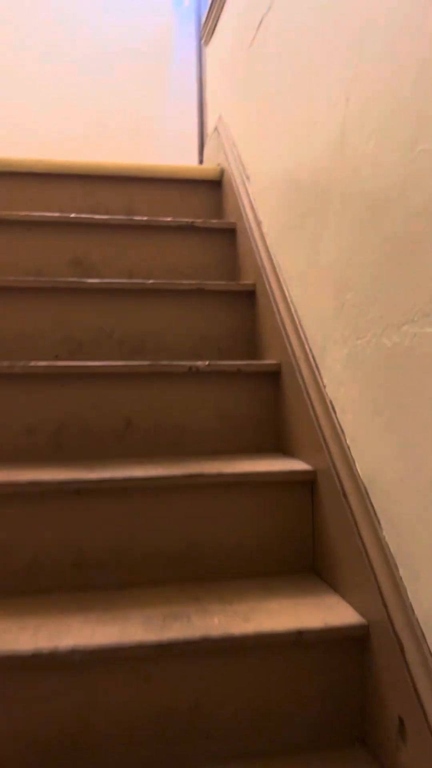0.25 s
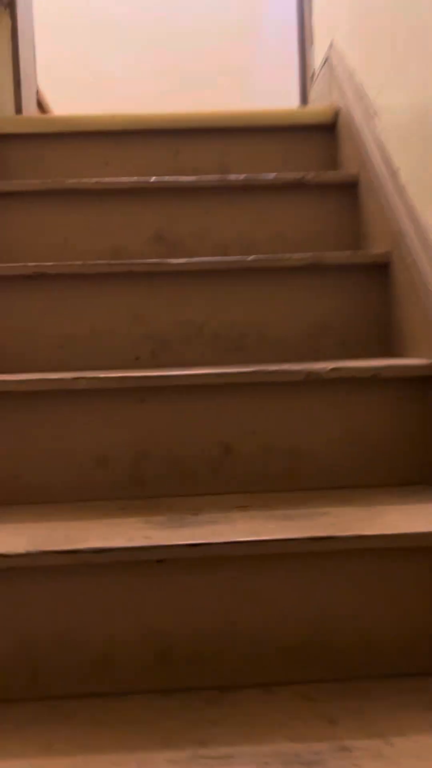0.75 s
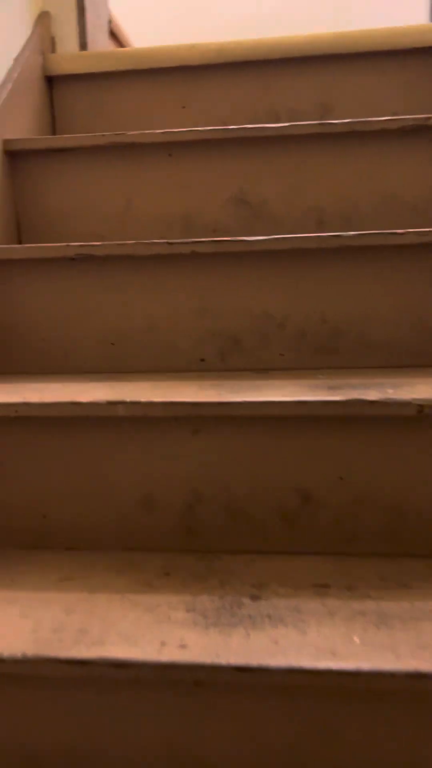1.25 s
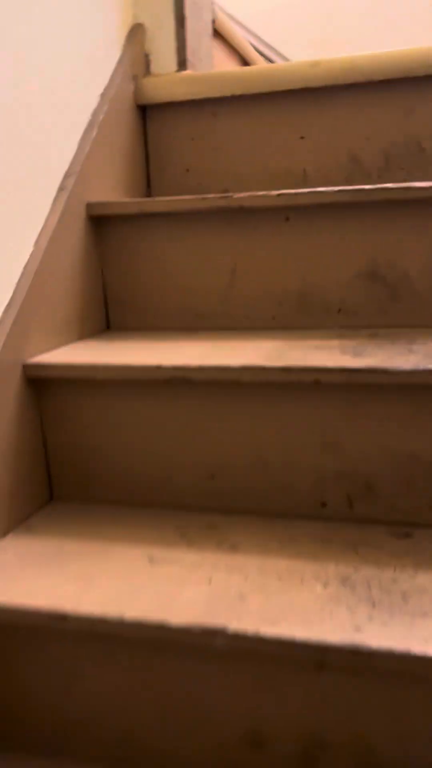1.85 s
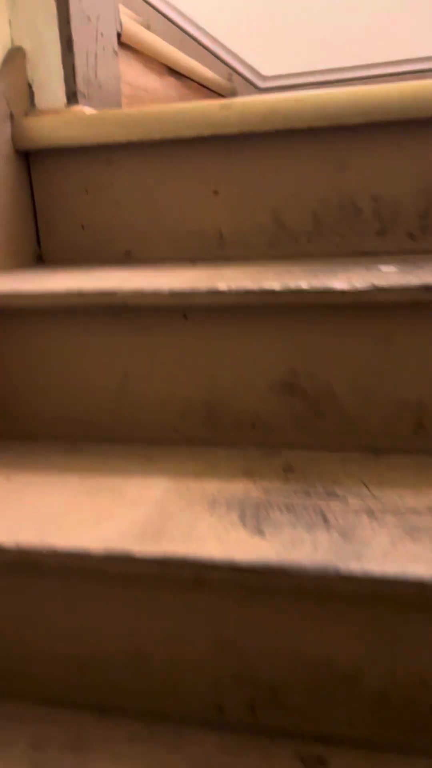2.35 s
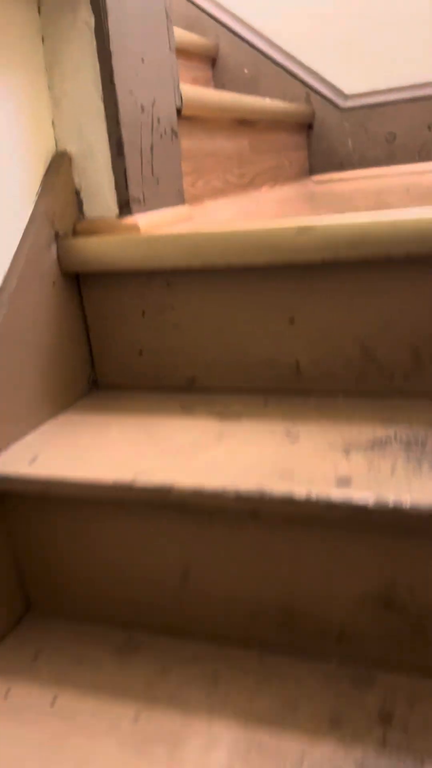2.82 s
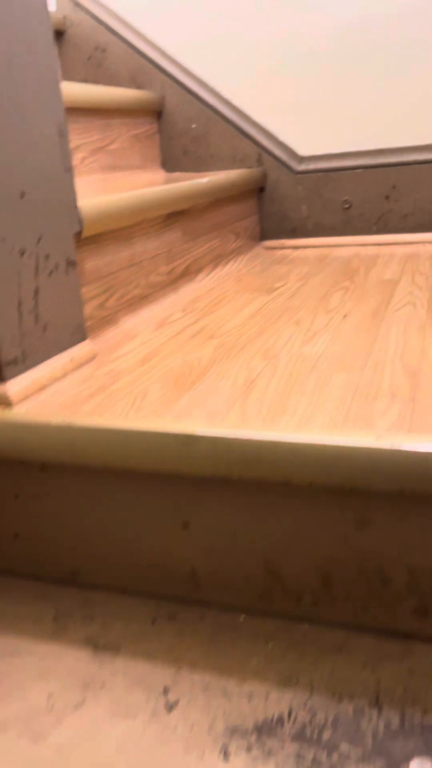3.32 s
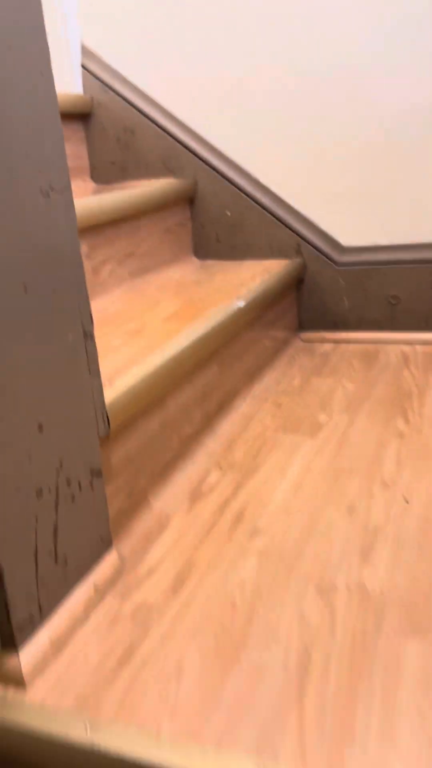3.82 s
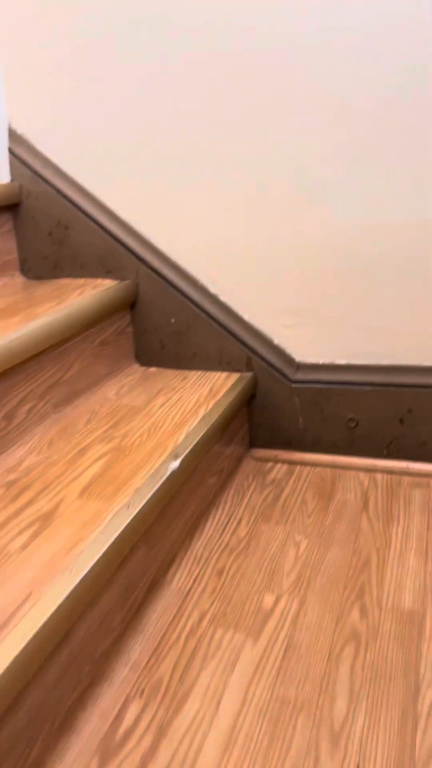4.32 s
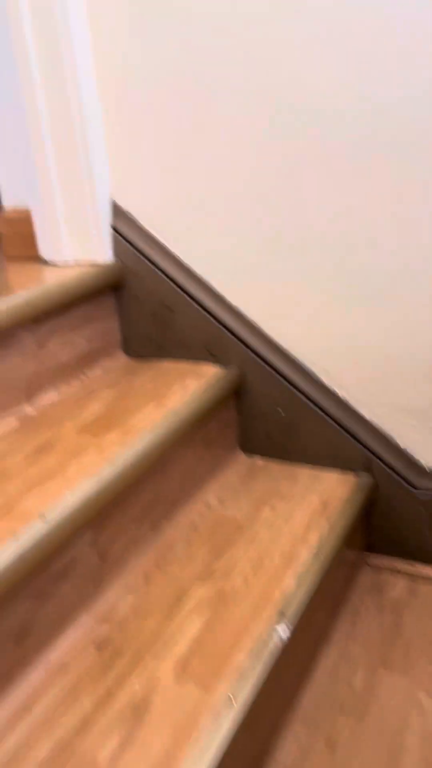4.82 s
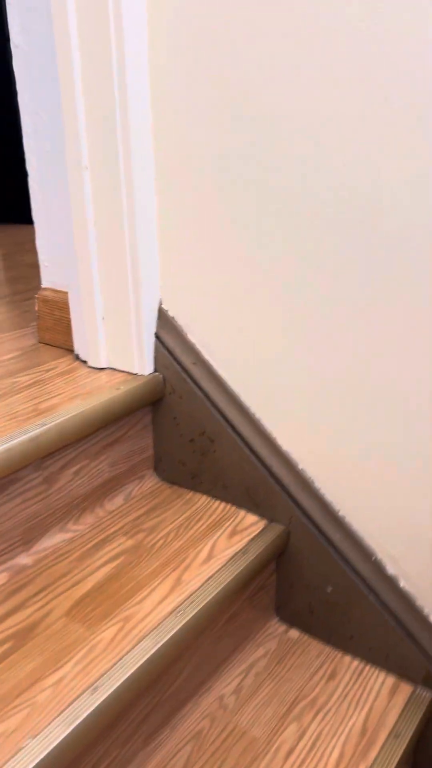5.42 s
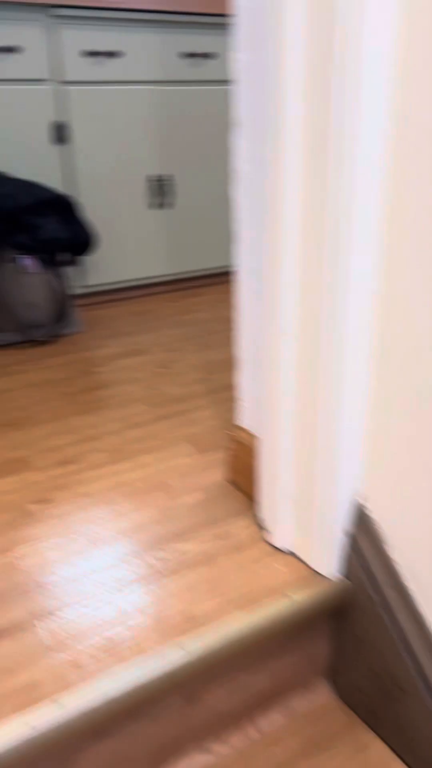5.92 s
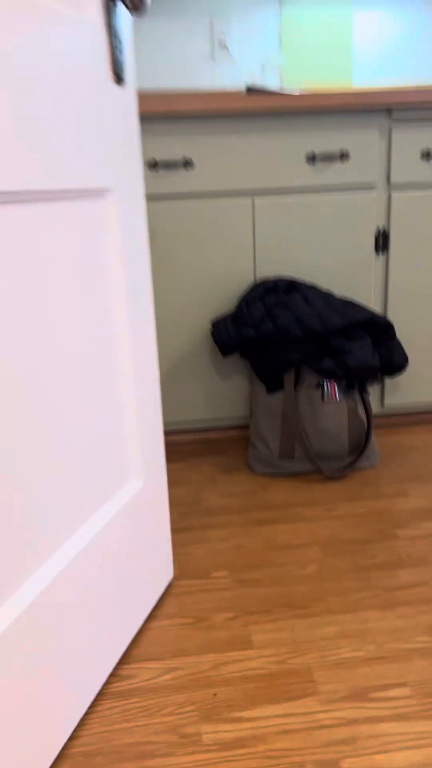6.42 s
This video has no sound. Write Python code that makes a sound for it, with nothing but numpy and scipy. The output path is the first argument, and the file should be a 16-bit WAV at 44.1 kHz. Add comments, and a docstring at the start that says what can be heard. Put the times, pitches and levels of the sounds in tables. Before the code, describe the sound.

Close, handheld perspective of one person going upstairs indoors. Heavy, cushioned shoe thuds ring woody treads, with dry joint snaps and two short creaks early on, and a cluster of sharp cracks just after two seconds. Midway the soles rub grittily over a landing, then lighter steps continue up to the floor. Low rumble, clothing rustle and small mechanical ticks remain underneath, in a short, enclosed reverberation.

```python
"""A quiet house first: unsteady low rumble, room hush and brushing clothes, faint scuffs and lens ticks.
From 0.5 s someone in shoes climbs a wooden staircase and ends on a wood floor: each footfall knocks on its
tread through wood modes, grit and joints snap as noise bursts, and the weight booms as decaying sines.
Gliding harmonics squeak at 1.4 and 1.8 s; grainy noise scuffs most on the landing, from 3.5 to 4.3 s.
Filtered, decaying noise echoes give the stairwell; lens ticks go on to the end."""
import sys
import numpy as np
from scipy import signal
from scipy.fft import rfft, irfft, next_fast_len
from scipy.io import wavfile
from scipy.ndimage import uniform_filter1d

SR = 44100
rng = np.random.default_rng(int(sys.argv[2]) if len(sys.argv) > 2 else 0)


def pcm_store(signal):
    """Save signal as 16-bit PCM."""
    levels = np.round(np.clip(np.atleast_2d(signal), -1, 1) * 32767)
    wavfile.write(sys.argv[1], SR, levels.astype(np.int16).T)


N = 294030
AGE_S = np.arange(SR * 11 // 20) / SR  # time since the start of one hit


def amp(db):
    """Decibels to gain."""
    return 10 ** (np.asarray(db) / 20)


def unit(x):
    """Scale to rms 1."""
    return x / np.sqrt(np.mean(x ** 2) + 1e-20)


def crest(x, size):
    """Scale a stereo sound so that the loudest stretch of size samples in its mid has rms 1."""
    return x / np.sqrt(uniform_filter1d(x.mean(0) ** 2, size, mode="constant").max())


def along(points, hz):
    """Read (frequency [Hz], value) points on a log frequency axis."""
    f, v = np.transpose(points)
    return np.interp(np.log(hz + 1), np.log(f), v)


def curves(rows):
    """One value per sample for each column after the time."""
    time_s, *columns = np.transpose(rows)
    return [np.interp(np.arange(N) / SR, time_s, column) for column in columns]


def filtered(x, response):
    """Multiply the spectrum of x by a response of frequency."""
    n = x.shape[-1]
    m = next_fast_len(n + 2048)
    return irfft(rfft(x, m) * response(np.fft.rfftfreq(m, 1 / SR)), m)[..., :n]


def coloured(x, spectrum):
    """Shape x by a (frequency [Hz], gain [dB]) spectrum, at rms 1."""
    return unit(filtered(x, lambda hz: amp(along(spectrum, hz))))


def fade(t, t60):
    """Exponential decay by 60 dB in t60 seconds."""
    return np.exp(-np.log(1000) * t / t60)


def onset(time_constant_s):
    """Exponential rise of one hit towards 1."""
    return 1 - np.exp(-AGE_S / time_constant_s)


def noise():
    """Fresh white noise as long as one hit."""
    return rng.standard_normal(len(AGE_S))


def uneven(size):
    """Noise smoothed over size samples, at rms 1: the irregularity within one hit."""
    return unit(uniform_filter1d(noise(), size=size))


def add(out, s, x):
    """Mix x into out from time s."""
    part = out[:, max(round(s * SR), 0):][:, :x.shape[-1]]
    part += x[..., :part.shape[1]]


# stereo width: (frequency [Hz], side re mid [dB])
SIDE_WIDTH = [(100, -66), (250, -29.5), (500, -13), (1000, -2.5), (2000, -12.5), (4000, -3), (10000, -8.5)]


def spread(pair, wide_db=0):
    """Two unrelated signals as mid and side: narrow in the bass, wider in the treble."""
    side = filtered(pair[1], lambda hz: amp(along(SIDE_WIDTH, hz) + wide_db))
    return np.array([pair[0] + side, pair[0] - side])


# decay of the stairwell: (frequency [Hz], t60 [s])
STAIRWELL_T60 = [(60, 0.4), (200, 0.41), (400, 0.41), (1000, 0.35), (3000, 0.38), (8000, 0.31),
                 (14000, 0.15)]


def echo(stretch=1):
    """The stairwell's answer from a new spot: decaying noise, energy 1 in the mid; stretch scales its t60."""
    hz, t, z = signal.stft(rng.standard_normal((2, len(AGE_S))), SR, nperseg=256)
    decay = fade(t, stretch * along(STAIRWELL_T60, hz)[:, None])
    tail = signal.istft(z * decay, SR, nperseg=256)[1][:, :len(AGE_S)]
    tail = tail * onset(0.00046)
    return spread(tail / np.linalg.norm(tail[0]))


def in_room(x, tail, wet_db):
    """Direct sound plus its echo."""
    return x + amp(wet_db) * signal.fftconvolve(x[None], tail, axes=1)[:, :len(x)]


# modes of a painted tread in the lower flight, and of a laminate one above the landing:
# (frequency [Hz], width [Hz], level [dB])
PAINTED_MODES = [(167.6, 20, 6.5), (199, 31, 3), (254.3, 24, 4.5), (311, 23, -1.5), (379, 26.6, 1.5),
                 (446, 120, -18), (604, 22, -15)]
LAMINATE_MODES = [(132, 33, -13), (208.5, 38, 1.5), (261.7, 11, 2), (326, 18, 1.5), (376.6, 44, -1),
                  (435, 22, -5)]
LANDING_END_S = 4.5
PAINTED_SOFT_HZ, LAMINATE_SOFT_HZ = 647, 434  # the shoe's cushioning dulls the sound above this


def tread(x, s, hz):
    """x through the modes of the tread underfoot at time s, at rms 1; the spot favours modes near hz."""
    on_paint = s < LANDING_END_S
    wood, soft_hz = (PAINTED_MODES, PAINTED_SOFT_HZ) if on_paint else (LAMINATE_MODES, LAMINATE_SOFT_HZ)
    mode = lambda f, c, width: 1j * f * width / (c * c - f * f + 1j * f * width)
    modes = lambda f: sum(amp(db) * mode(f, c, width) for c, width, db in wood)
    spot = lambda f: 1.3 + 1 / (1 + 1j * (f - hz) / 70)
    soft_sole = lambda f: 1 + 1j * f / soft_hz - (f / soft_hz) ** 2
    return unit(filtered(x, lambda f: modes(f) * spot(f) / soft_sole(f)))


# (time [s], level [dB])
CLOTH_LEVEL = [(0, -62), (.35, -62.5), (.48, -70), (.7, -63.5), (1, -60.5), (1.6, -62.5), (2.6, -56.5),
               (3.7, -63.5), (5.4, -60), (5.9, -62), (6.03, -61.5), (6.25, -63), (6.67, -62)]
RUMBLE_LEVEL_DB = [(0, -44), (1, -45), (3.5, -37.5), (5, -46.5), (6, -45), (6.67, -43)]
# spectra of rumble, house and cloth: (frequency [Hz], gain [dB])
RUMBLE_SPECTRUM = [(20, -24), (40, -4), (60, 2.5), (95, 0), (140, -5.5), (250, -14), (400, -23), (700, -33),
                   (2000, -65)]
HOUSE_SPECTRUM = [(100, -6), (250, -6), (400, 16.5), (600, 9), (1000, 8), (1500, 7), (2400, 2), (3500, -47),
                  (8000, -43)]
CLOTH_SPECTRUM = [(1500, -1), (2800, 2), (4500, -2.5), (8000, -1.5), (10500, -3.5), (12000, -37),
                  (16000, -15)]


def background():
    """Coloured noise: an unsteady low rumble, the hush of the house, clothes moving with the climb."""
    cloth_db, = curves(CLOTH_LEVEL)
    rumble_db, = curves(RUMBLE_LEVEL_DB)
    hush = lambda spectrum: spread(coloured(rng.standard_normal((2, N)), spectrum), wide_db=-1.0)
    sway_db = 2 * np.interp(np.arange(N), np.linspace(0, N, num=50), rng.standard_normal(50))
    rumble = amp(rumble_db + sway_db) * hush(RUMBLE_SPECTRUM)
    house = amp(-56.5) * hush(HOUSE_SPECTRUM)
    cloth = amp(cloth_db) * hush(CLOTH_SPECTRUM)
    return rumble + house + cloth


GRAINS_PER_S = 260
GRAIN_DB, GRAIN_SPREAD_DB = -1, 3.5  # coarse grains: level re the fine rub, scatter of size


def grains():
    """Friction under a sole: a fine rub with coarse grains catching at random moments."""
    flutter = unit(uniform_filter1d(rng.standard_normal(N), size=160))
    fine = unit(rng.standard_normal((2, N)) * amp(0.64 * flutter))
    sizes = amp(GRAIN_SPREAD_DB * rng.standard_normal(N).clip(-2, 2))
    catches = (rng.random(N) < GRAINS_PER_S / SR) * sizes
    coarse = signal.fftconvolve(catches, fade(AGE_S, .004))[:N] * rng.standard_normal((2, N))
    return unit(fine + amp(GRAIN_DB) * unit(coarse))


# soles sliding: (time [s], length [s], tread [dB], rub [dB], grit [dB], swell over the stroke [dB])
SCUFF_STROKES = [(0.145, 0.036, -64, -55, -81, -5), (0.23, 0.029, -65, -44, -64, -1),
                 (2.655, 0.02, -27.5, -34.5, -50.5, 0), (3.191, 0.056, -42.5, -50, -87, -11),
                 (3.503, 0.12, -42, -51.5, -61, -13.5), (3.613, 0.02, -38, -37, -72, 4),
                 (3.907, 0.1, -36, -39, -50.5, 1), (4.081, 0.034, -45, -34, -49.5, -6.5),
                 (4.137, 0.1, -39, -36.5, -52, 1), (4.229, 0.082, -36, -39, -55, 12),
                 (4.811, 0.057, -41.5, -47, -59, -7), (4.975, 0.045, -36.5, -38.5, -54.5, 0),
                 (5.284, 0.12, -47, -36.5, -53, -12), (5.607, 0.07, -38, -47.5, -53, 11),
                 (6.162, .015, -52, -60, -58.5, 0), (6.385, .02, -60, -57, -54.5, 1)]
# spectra: (frequency [Hz], gain [dB])
RUB_SPECTRUM = [(300, 3.5), (650, -2.5), (1200, -2.5), (2000, -6.5), (2600, -12.5), (3500, -16.5),
                (6000, -63)]
GRIT_SPECTRUM = [(1800, -21), (3200, 5.5), (5000, 4), (8000, 2), (10500, -3.5), (12500, -29), (16000, -14)]
SCUFF_RISE_S, SCUFF_T60_S = 0.022, 0.27
CATCH_DB = 1.1  # the sole catches and frees itself unevenly


def scuffs():
    """A sliding sole catches on grains, which also shake the tread; strokes rise, swell or sink, die away."""
    out, t = np.zeros((2, N)), np.arange(N) / SR
    shake = grains()
    rub = spread(coloured(grains(), RUB_SPECTRUM))
    grit = spread(coloured(grains(), GRIT_SPECTRUM))
    drift = uniform_filter1d(rng.standard_normal(N), size=700)
    catch_db = CATCH_DB * unit(uniform_filter1d(drift, size=300))
    for start, length, wood_db, rub_db, grit_db, swell_db in SCUFF_STROKES:
        wood = tread(shake[0], start, hz=360)
        progress = np.clip((t - start) / length, 0, 1)
        pressure = amp(catch_db + swell_db * (progress - .5))
        rise = np.clip((t - start) / SCUFF_RISE_S, 0, 1)
        contact = rise * fade(np.maximum(t - start - length, 0), SCUFF_T60_S)
        out += contact * pressure * (amp(wood_db) * wood + amp(rub_db) * rub + amp(grit_db) * grit)
    return out


# lens ticks, each starting 1 ms before its time: (time [s], level [dB])
LENS_TICKS = [(0.224, -38), (0.33, -36), (0.975, -38), (1.636, -37), (2.972, -43.5), (3.168, -47),
              (4.7007, -38.5), (4.809, -43), (4.998, -40), (5.506, -39), (6.1437, -42.5), (6.412, -40),
              (6.5114, -39)]
# spectrum: (frequency [Hz], gain [dB])
LENS_SPECTRUM = [(500, -14), (900, -1.5), (2100, 1.5), (2800, -24), (5000, -16), (8000, -29), (12000, -73)]
TICK_HZ = 1394


def lens_ticks():
    """A lens rattles in its mount, right at the microphones: a tiny buzz with no echo."""
    out = np.zeros((2, N))
    for s, db in LENS_TICKS:
        gate = np.sin(np.pi * np.minimum(AGE_S / 0.0088, 1))
        buzz = np.sin(2 * np.pi * TICK_HZ * AGE_S) + 0.72 * coloured(noise(), LENS_SPECTRUM)
        add(out, s - .001, amp(db) * gate * buzz)
    return out


# footfalls: (time [s], knock [dB], slap [dB], grit [dB], tread pitch [Hz],
#   roll from first touch to flat sole [s], flat sole re first touch [dB], weight [dB],
#   wait before the weight comes [s], its rise [s], boom pitch [Hz], boom t60 [s], whole-flight share [0-1])
FOOTFALLS = [(0.502, -22.5, -45, -53, 201, 0.028, -1.5, -17.5, 0.017, 0.028, 85.3, 0.37, 0.42),
             (1.151, -21, -28.5, -60, 340, 0.038, -3.5, -11, 0.02, 0.013, 63.1, 0.5, 0.4),
             (1.66, -28.5, -36, -54, 295, 0.051, -3.5, -19.5, 0.016, 0.0075, 100.7, 0.62, 0.56),
             (2.181, -26.5, -32, -44, 420, 0.048, 0.5, -12, 0.057, 0.02, 101.9, .45, 0.8),
             (2.763, -26.5, -38.5, -43, 361, 0.013, 1.5, -12.5, 0.01, 0.035, 108.4, 0.33, 0.73),
             (3.254, -23, -32, -44, 250, 0.014, 0, -16.5, 0.0043, 0.015, 102.4, 0.41, 0.56),
             (3.78, -24, -32.5, -41.5, 246, 0.024, -5, -22, 0.0023, 0.017, 97.3, 0.57, 0.26),
             (4.3176, -27.5, -28, -46, 472, 0.017, -6, -23.5, 0.0157, 0.017, 84.7, .33, 0.8),
             (4.862, -19, -34, -47, 335, 0.058, -12, -25.5, 0.0082, 0.021, 145, 0.28, .7),
             (5.29, -27.5, -37.5, -35, 367, .025, -3.5, -37, 0.0041, 0.048, 79, 0.75, 0.4),
             (5.511, -31, -43, -49.5, 184, 0.02, -9, -15, 0.0031, 0.038, 84.3, 0.52, 0.13),
             (5.654, -29.5, -38, -42, 384, 0.025, -4.5, -25.5, 0.0027, 0.014, 80, .35, 0.13),
             (6.228, -36.5, -57, -75, 169, 0.028, -18, -28, 0.0032, 0.01, 130, .3, 0.6),
             (6.302, -28.5, -48, -44.5, 394, 0.013, -25, -29, 0.0017, 0.0072, 85, 0.37, 0.3)]
SETTLE_S, SETTLE_DB = .032, -5.5  # after the flat sole; re the quieter of first touch and flat sole


def touches():
    """A foot rolls on: first touch, flat sole, settling. Rows (s, knock dB, slap dB, grit dB, pitch Hz)."""
    rows = []
    for s, knock_db, slap_db, grit_db, hz, roll, sole_db, *_ in FOOTFALLS:
        settling = (roll + SETTLE_S, min(sole_db, 0) + SETTLE_DB)
        for lag, db in [(0, 0), (roll, sole_db), settling]:
            rows.append((s + lag, knock_db + db, slap_db + db, grit_db + db, hz))
    return rows


# a foot rocking on its tread or pushing off: (time [s], knock [dB], slap [dB], weight [dB], tread pitch [Hz])
PUSH_OFFS = [(1.442, -40.5, -46, -30.5, 336), (1.813, -28, -39, -33, 342), (1.971, -30, -35.5, -29, 359),
             (2.558, -29.5, -40, -28, 286), (2.607, -29, -37.5, -45, 428), (2.879, -30.5, -69, -32, 353),
             (3.597, -33.5, -47, -39, 333), (4.588, -38.5, -46.5, -48, 347), (4.957, -32.5, -59, -44, 264),
             (5.028, -27.5, -39.5, -35, 278), (5.139, -34.5, -59, -54, 442)]
# dry joints letting go under the load:
# (time [s], snap [dB], room re snap [dB], pitch [Hz], knock on the tread [dB], tread pitch [Hz])
JOINTS = [(0.526, -28.5, 0.5, 2360, -37, 205), (0.535, -30, 4.5, 1346, -23.5, 257),
          (1.1907, -33.5, -7.5, 1706, -28, 181), (1.213, -45, -1, 2590, -47, 310),
          (1.224, -37, -6, 1580, -33, 303), (1.243, -41, 6, 1690, -33, 256),
          (1.702, -43.5, 11, 2580, -46, 308), (1.723, -41, -1, 1610, -32.5, 420),
          (1.8569, -35.5, 1.5, 2450, -40.5, 406), (1.961, -44.5, 15, 2670, -33.5, 309),
          (1.974, -49, -10, 1530, -32.5, 465), (1.9846, -34.5, -1, 2206, -44, 306),
          (2.053, -52, -15, 2110, -61, 404), (2.194, -31, -4, 2500, -27, 560),
          (2.231, -44, -11, 1610, -39, 425), (2.2729, -25, -7, 1660, -35, 180),
          (2.276, -32.5, 2, 1600, -38, 300), (2.2971, -24, -8, 1173, -42, 259.5),
          (2.3571, -20.5, -4.5, 2517, -25, 398), (2.4465, -25.5, -4.5, 1426, -57, 254),
          (2.465, -53, -7, 1470, -44, 394), (2.779, -26.5, -4.5, 1710, -30, 276),
          (2.8122, -33, 4.5, 1230, -26.5, 160), (2.8339, -35, -15, 1800, -38, 383),
          (3.299, -30, -8, 1350, -21.5, 475), (3.318, -29, -1.5, 1480, -29, 417),
          (3.3857, -32, -1.5, 2120, -33.5, 470), (3.6032, -36, 6, 1380, -57, 415),
          (3.7913, -31.5, -2, 1480, -40, 458), (3.827, -36.5, -3, 1750, -34, 250),
          (4.073, -37, 2, 1570, -36.5, 393), (4.318, -43, 11, 1870, -46, 650),
          (4.331, -51, 0, 1500, -21, 205), (4.8699, -34, 4.5, 1120, -27.5, 340)]
PUSH_ROLL_S, PUSH_SOLE_DB = 0.033, -8.5
JOINT_SLAP_DB = -9  # a joint also rattles its board: level re the snap


def blows():
    """All that strikes a tread: feet landing or pushing off, joints. Rows (s, knock dB, slap dB, pitch Hz)."""
    landing = [(s, knock_db, slap_db, hz) for s, knock_db, slap_db, _, hz in touches()]
    leaving = [(s + lag, knock_db + db, slap_db + db, hz)
               for s, knock_db, slap_db, _, hz in PUSH_OFFS
               for lag, db in [(0, 0), (PUSH_ROLL_S, PUSH_SOLE_DB)]]
    joints = [(s, knock_db, db + JOINT_SLAP_DB, hz) for s, db, _, _, knock_db, hz in JOINTS]
    return landing + leaving + joints


# how strongly the walls answer a knock along the way: (time [s], level [dB])
KNOCK_ROOM_LEVEL = [(.5, -4.5), (2.5, -1.5), (4.3, 0.5), (5.3, -3), (6.3, -5.5)]
# spectrum: (frequency [Hz], gain [dB])
SLAP_SPECTRUM = [(300, -50), (520, 2.5), (720, 6.5), (1250, 0.5), (1800, -3), (2500, -8), (3300, -16.5),
                 (5000, -26), (8000, -26), (11000, -57), (13000, -86)]
SOLE_RISE_S, BOARD_RISE_S = .0022, .005  # time constants


def knocks():
    """A shoe meets a tread: the sole slaps, and the board rings most at a pitch set by the spot."""
    out = np.zeros((2, N))
    for s, knock_db, slap_db, hz in blows():
        tail = echo()
        board = tread(noise() * fade(AGE_S, 0.058) * onset(BOARD_RISE_S), s, hz)
        ring = unit(np.sin(2 * np.pi * hz * AGE_S) * fade(AGE_S, 0.066) * onset(BOARD_RISE_S))
        knock = board + 0.57 * ring
        room_db = np.interp(s, *np.transpose(KNOCK_ROOM_LEVEL))
        patches = amp(4.1 * uneven(90))  # the sole touches down in many small patches
        slap = coloured(noise(), SLAP_SPECTRUM) * patches * fade(AGE_S, 0.05) * onset(SOLE_RISE_S)
        add(out, s, amp(knock_db) * crest(in_room(knock, tail, room_db), size=530))
        add(out, s, amp(slap_db) * crest(in_room(slap, tail, wet_db=2.5), size=530))
    return out


GRIT_HZ, GRIT_ROOM_DB = 2280, 4.5  # grit crushed at each touch: median pitch, room re snap


def snaps():
    """Joints in the boards, and grit under each touch of a sole. Rows (s, dB, room dB, pitch Hz)."""
    joints = [(s, db, room_db, hz) for s, db, room_db, hz, *_ in JOINTS]
    grit = [(s, db, GRIT_ROOM_DB, GRIT_HZ * np.exp(rng.normal(0, 0.11))) for s, _, _, db, _ in touches()]
    return joints + grit


# spectrum: (frequency [Hz], gain [dB])
SNAP_SPECTRUM = [(250, -24), (600, -1), (1500, 6), (2100, 1.5), (2600, 1), (3600, -1), (5000, -2.5),
                 (8000, 0), (10500, -6.5), (12500, -22.5), (16000, -21)]
SNAP_T60_S, SPLINTER_DB = 0.031, 4.2  # a short, uneven run of splinters
PING_GAIN, PING_WIDTH_HZ = 0.92, 630  # boost at the snap's own pitch, half-width


def cracks():
    """Joints and grit snap under the load in a short burst of splinters, every one at its own pitch."""
    out = np.zeros((2, N))
    for s, db, room_db, hz in snaps():
        splinters = noise() * amp(SPLINTER_DB * uneven(24))
        peak = lambda f: 1 + PING_GAIN / (1 + ((f - hz) / PING_WIDTH_HZ) ** 2)
        colour = lambda f: amp(along(SNAP_SPECTRUM, f)) * peak(f)
        snap = filtered(splinters * fade(AGE_S, SNAP_T60_S) * onset(0.0002), colour)
        answer = filtered(echo(), colour) * onset(0.00092)
        add(out, s, amp(db) * crest(unit(snap) + amp(room_db) * unit(answer), size=176))
    return out


PUSH_LOAD_S, PUSH_BOOM_HZ, PUSH_BOOM_T60_S, PUSH_SHARE = 0.045, 64.1, 0.43, 0.32  # rear foot presses down


def loads():
    """Weight after each footfall and at push-off. Rows (s, dB, rise s, pitch Hz, t60 s, flight share)."""
    landing = [(s + wait, db, rise, hz, t60, share)
               for s, *_, db, wait, rise, hz, t60, share in FOOTFALLS]
    leaving = [(s, db, PUSH_LOAD_S, PUSH_BOOM_HZ, PUSH_BOOM_T60_S, PUSH_SHARE)
               for s, *_, db, _ in PUSH_OFFS]
    return landing + leaving


# modes of the whole flight, before scatter: (frequency [Hz], level [dB], t60 over that of the loaded board [1])
FLIGHT_MODES = [(27.3, -20, 0.68), (39.9, -4.5, 1.5), (59.53, -1, 1.67), (84.2, -2.5, 0.89),
                (101, -1, 1.57), (131.8, -1, 0.41)]


def thuds():
    """The weight follows the foot: the loaded board booms and shakes the hollow flight."""
    out = np.zeros((2, N))
    for s, db, rise, hz, boom_t60, share in loads():
        load = np.sin(np.pi / 2 * np.minimum(AGE_S / rise, 1)) ** 2
        since = np.maximum(AGE_S - rise, 0)
        boom = np.sin(2 * np.pi * hz * AGE_S) * fade(since, boom_t60)
        frame = 0
        for f, level, life in FLIGHT_MODES:
            gain = amp(level + rng.normal(0, 2.8))
            turn = 2 * np.pi * (f * rng.normal(1, 0.027) * AGE_S + rng.random())
            frame = frame + gain * fade(since, life * boom_t60) * np.sin(turn)
        add(out, s, amp(db) * crest(in_room(load * (boom + share * frame), echo(), wet_db=-28.5), size=530))
    return out


# modes of a board jolted by its own joint: (pitch over the tread pitch [1], level [dB], t60 [s])
JOLTED_BOARD_MODES = [(1.002, 3, 0.063), (2.03, -8.5, 0.2), (2.85, -11, 0.18), (3.7, -10, 0.064)]
JOINT_RING_DB, PING_DB = -8, -9  # board ring and the joint's own note, re the snap
PING_T60_S = 0.12


def joint_rings():
    """A snapping joint sounds its own short note and sets its board ringing cleanly."""
    out = np.zeros((2, N))
    for s, db, _, ping_hz, _, board_hz in JOINTS:
        board = sum(amp(level) * np.sin(2 * np.pi * ratio * board_hz * AGE_S) * fade(AGE_S, t60)
                    for ratio, level, t60 in JOLTED_BOARD_MODES)
        board = board * onset(BOARD_RISE_S)
        ping = np.sin(2 * np.pi * ping_hz * AGE_S) * fade(AGE_S, PING_T60_S)
        tail = echo()
        add(out, s, amp(db + JOINT_RING_DB) * crest(in_room(board, tail, wet_db=-8.5), size=530))
        add(out, s, amp(db + PING_DB) * crest(in_room(ping, tail, wet_db=-15.5), size=176))
    return out


# a board slipping on its nail, a few quick slips to a creak: (time [s], level [dB], first pitch [Hz],
#   last pitch [Hz], length [s], tilt [dB per kHz], roughness [0-1])
SLIPS = [(1.4425, -32.5, 880, 945, .02, -3.9, .17), (1.453, -37, 725, 785, .014, -5.5, .17),
         (1.469, -35, 945, 962, .018, -7.5, .12), (1.777, -33, 795, 825, .024, -.2, .27),
         (1.79, -30, 978, 940, .016, -1.2, .38), (1.811, -36, 912, 925, .018, -.2, .33)]
# spectra of the notes and of the dry scrape within: (frequency [Hz], gain [dB])
SQUEAL_SPECTRUM = [(500, 2), (850, -2.5), (1300, 2), (1700, -5), (2350, 2.5), (2750, 1), (3300, -4.5),
                   (5000, -4), (8000, 3), (11000, -7), (12500, -33), (15000, -26)]
RASP_SPECTRUM = [(400, -12), (900, -5), (1800, -2), (2700, -20), (3500, -11), (8000, -16), (11000, -21),
                 (13000, -33)]
GRIP_S = 0.005  # time constant: a slip builds up as the nail grips
WAVER, ROUGH_WAVER = .006, .06  # relative unsteadiness of the slip rate, and its growth with roughness
CREAK_RING = 0.92  # t60 of the echo over that of a knock's


def squeaks():
    """A board sticks and slips on its nail; each slip glides at its own rate, and the echoes overlap."""
    out = np.zeros((2, N))
    for s, db, first_hz, last_hz, length, tilt_db, rough in SLIPS:
        glide_hz = np.interp(AGE_S, [0, length], [first_hz, last_hz])
        rate_hz = glide_hz * (1 + (WAVER + ROUGH_WAVER * rough) * uneven(110))
        turn = 2 * np.pi * np.cumsum(rate_hz) / SR
        harmonics = sum(amp(tilt_db * (k - 1) * first_hz / 10 ** 3) * np.sin(k * turn) / np.sqrt(k)
                        for k in range(1, 18))
        slips = coloured(harmonics, SQUEAL_SPECTRUM)
        rasp = coloured(noise() * amp(6.1 * uneven(60)), RASP_SPECTRUM)
        stroke = onset(GRIP_S) * np.exp(-(AGE_S / length) ** 4)
        creak = stroke * ((1 - rough) * slips + rough * rasp)
        add(out, s, amp(db) * crest(in_room(creak, echo(CREAK_RING), wet_db=-3.5), size=530))
    return out


# grains of dirt bursting under a turning sole: (time [s], level [dB])
DIRT_GRAINS = [(3.5915, -52), (4.093, -40.5), (4.1439, -45), (4.1633, -47), (4.182, -48), (4.2357, -47),
               (4.9794, -52)]
DIRT_T60_S, DIRT_ROOM_DB = 0.021, -8


def dirt():
    """Single grains burst under a sliding sole: short, bright ticks."""
    out = np.zeros((2, N))
    for s, db in DIRT_GRAINS:
        burst = coloured(noise(), GRIT_SPECTRUM) * fade(AGE_S, DIRT_T60_S)
        add(out, s, amp(db) * crest(in_room(burst, echo(), wet_db=DIRT_ROOM_DB), size=88))
    return out


def scene():
    """Everything heard on the way up."""
    feet = scuffs() + knocks() + thuds() + dirt()
    boards = cracks() + joint_rings() + squeaks()
    return background() + lens_ticks() + feet + boards


# (frequency [Hz], lead of the left microphone [rad])
MIC_PHASE = [(30, .025), (125, .05), (400, 0), (4600, 0), (5500, -1), (10000, -1.3), (15000, -1.7)]
TOP_HZ = 16200


def record(dry):
    """Two microphones differ a little in phase, lose the deepest bass and keep nothing from TOP_HZ up."""
    phase = lambda hz: np.exp(.5j * along(MIC_PHASE, hz) * np.array([[1], [-1]]))
    low_cut = lambda hz: 1j * hz / (22 + 1j * hz)
    return filtered(dry, lambda hz: phase(hz) * low_cut(hz) * (hz < TOP_HZ))


dry = scene()
out = record(dry)
pcm_store(out)
```